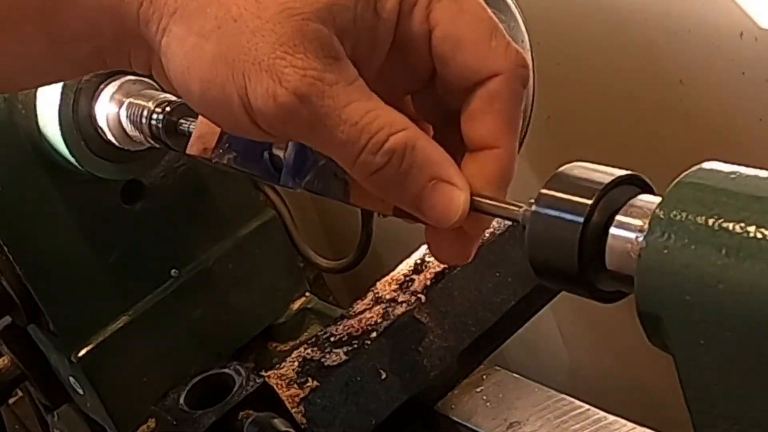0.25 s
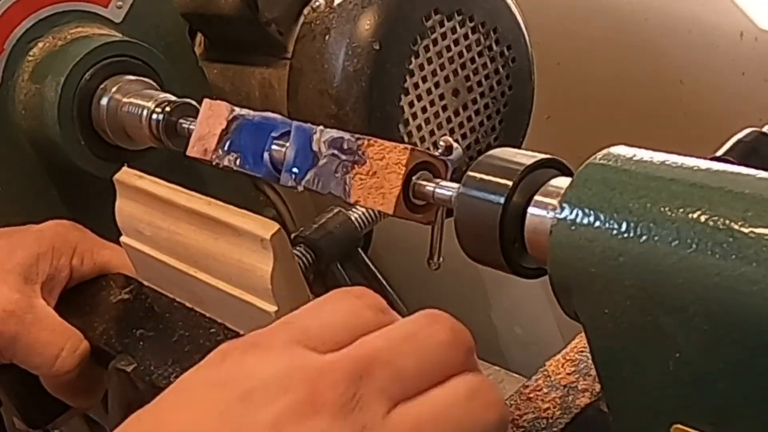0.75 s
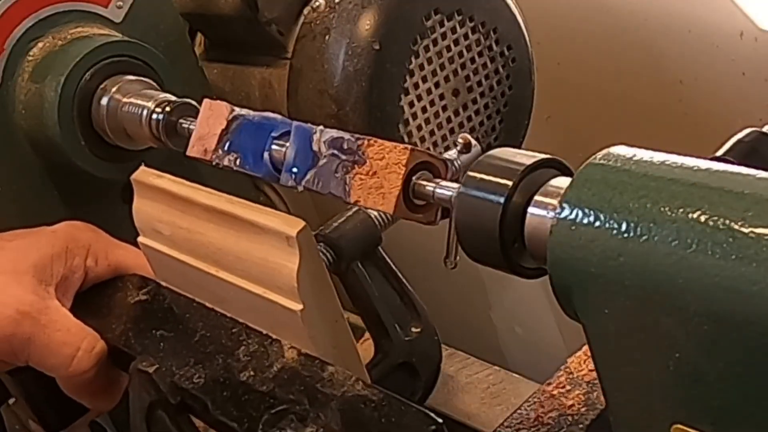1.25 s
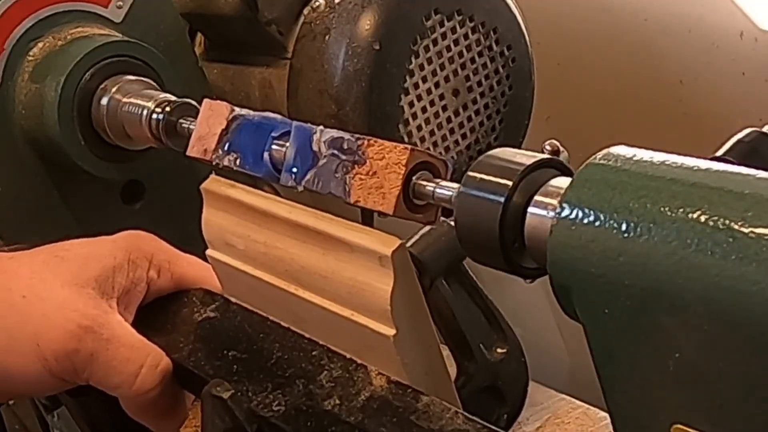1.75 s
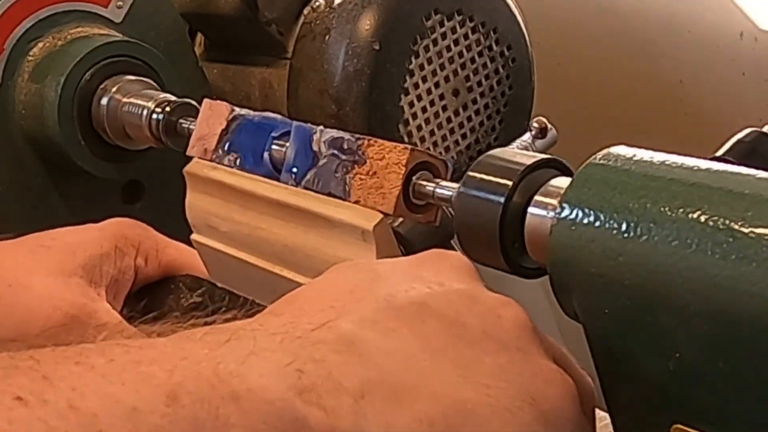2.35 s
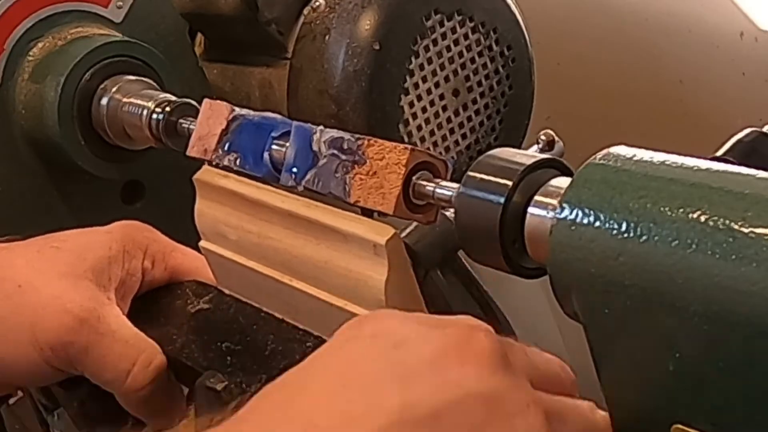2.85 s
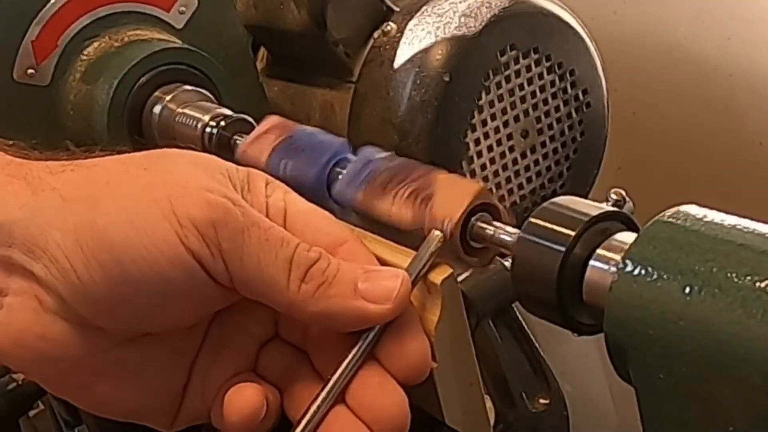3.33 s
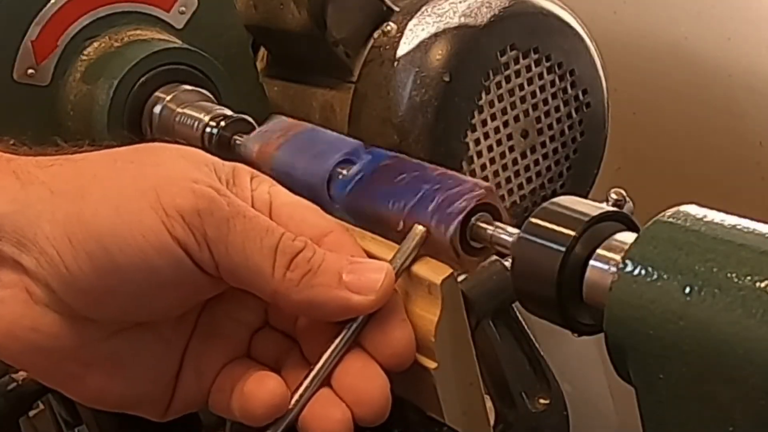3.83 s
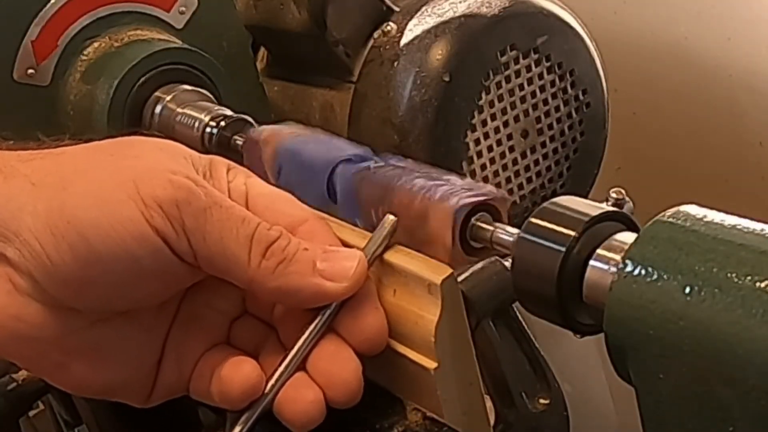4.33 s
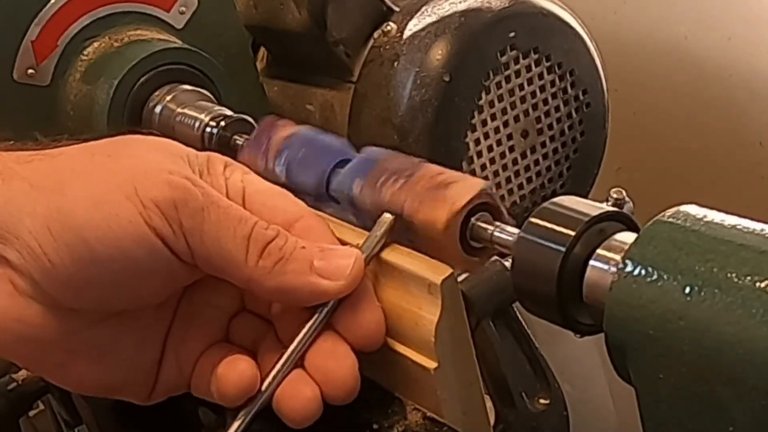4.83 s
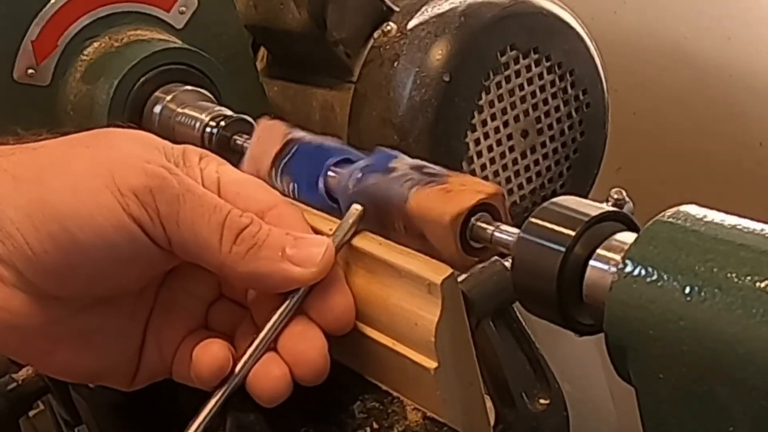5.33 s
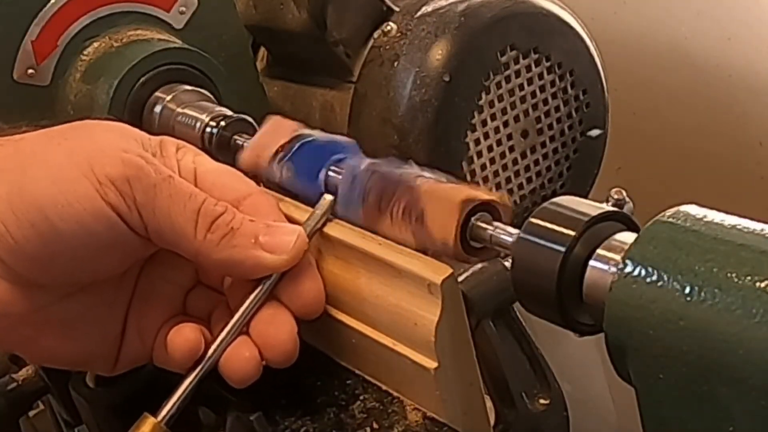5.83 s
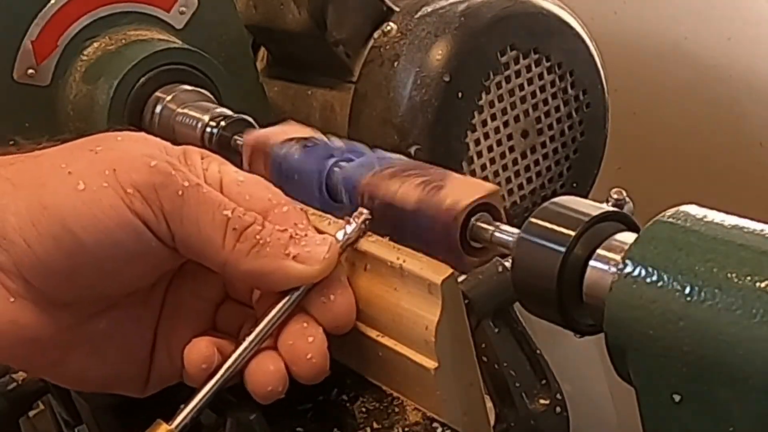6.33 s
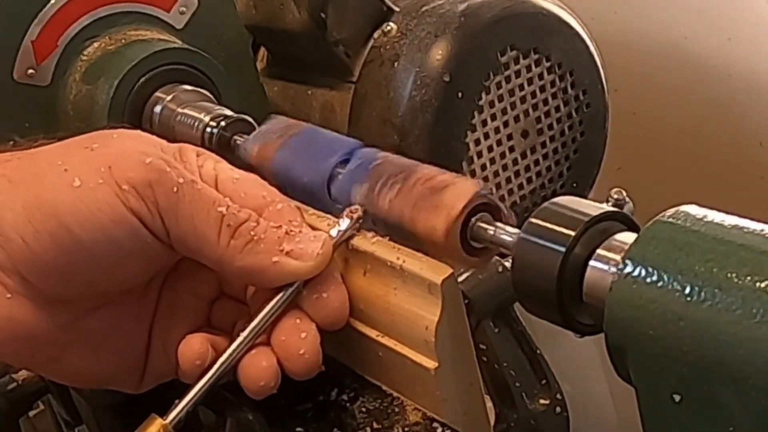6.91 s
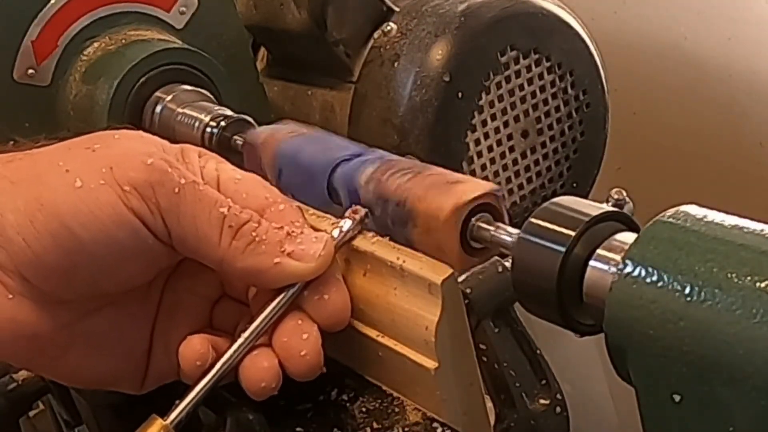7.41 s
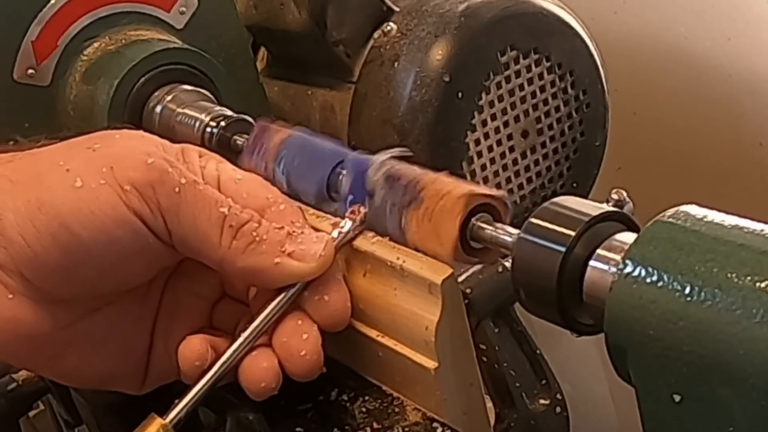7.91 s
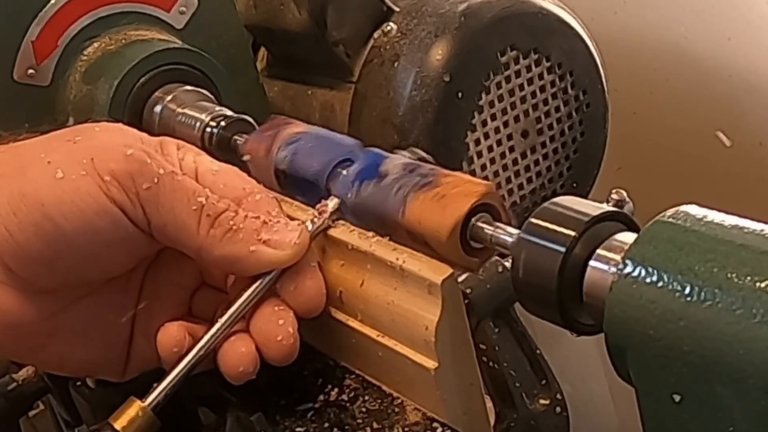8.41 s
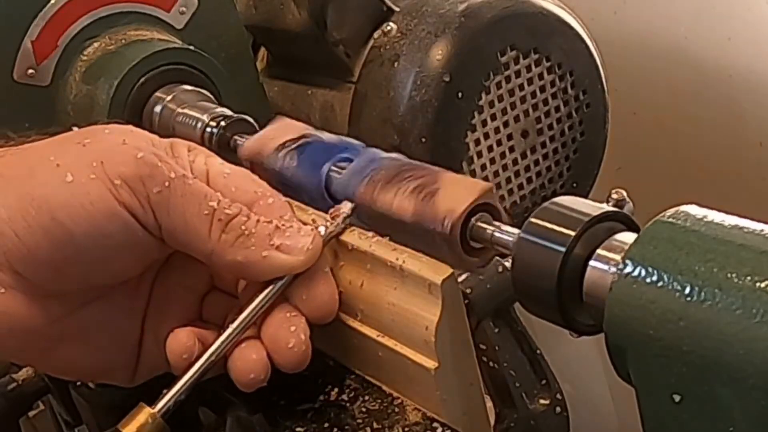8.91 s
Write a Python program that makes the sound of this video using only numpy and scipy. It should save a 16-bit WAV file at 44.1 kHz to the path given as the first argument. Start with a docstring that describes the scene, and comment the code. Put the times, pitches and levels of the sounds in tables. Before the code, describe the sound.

In a quiet workshop, heard close, soft air surrounds a short gritty metal grind from 0.1 s, the tailstock sliding along the bed and clicking at 0.28 s. Light dry touches come near 0.47 and 0.75 s. From 0.9 to 2.4 s, clamps and tool rest give irregular ringing iron knocks, the sharpest around 1.41 and 2.09 s, with firm clacks near 1.5 and 2.28 s. Near quiet follows until 3.06 s, when a lathe is abruptly at full speed, with no run-up. Its steady, slightly beating whine, rough belt drone and bright dense rattle carry a fast buzzing scrape from the tool on the square blank. Scraping chatters harder from 5.2 to 5.9 s. A brief dull bump lands at 6.05 s; then the whine strengthens and the pulsing eases. Cutting pressure still varies, with a harsher bite around 8.4 s, and the machine runs on to the end.

```python
"""A small wood lathe in a workshop, heard close to a two-port microphone in the shop's quiet air.
First the tailstock grinds along the iron bed to a click; then light dry touches and ringing knocks
of clamps and tool rest. Abruptly the lathe is at full speed: shaft and bearing tones whine, filtered noise
is the belt's drone, dense tiny impacts are the rattle, and bursts of fractures once a turn
are a hand tool scraping a square pen blank. Midway comes one brief dull bump."""
import sys
import numpy as np
from scipy import signal
from scipy.fft import rfft, irfft
from scipy.io import wavfile
from scipy.ndimage import uniform_filter1d, minimum_filter1d

SR = 44100
rng = np.random.default_rng(int(sys.argv[2]) if len(sys.argv) > 2 else 0)


def materialize(psi):
    """Save the field psi as 16-bit PCM at rate SR to the path in sys.argv[1].

    A 1-D psi becomes a single channel; in a 2-D psi each row is a channel.
    """
    bounded = np.clip(np.atleast_2d(psi).T, -1, 1)
    quanta = np.round(bounded * 32767).astype(np.int16)
    wavfile.write(sys.argv[1], SR, quanta)


N = 403956
T = np.arange(N) / SR
HZ = np.fft.rfftfreq(N, 1 / SR)

START_S = 3.064  # the lathe is heard from here
CHANGE_S = 6.05  # from here the spindle tones are stronger and the once-a-turn bursts weaker
SPINDLE_HZ = 43.64  # turns per second

# spectrum of struck iron: [hz, relative level_db per Hz]
IRON_SPECTRUM = [(100, -50), (240, -18), (340, -15.5), (470, -9.5), (620, 5.5), (770, -4.5), (930, 0.5),
                 (1300, -5), (1600, -7), (2100, -5.5), (2800, -5.5), (4300, -4.5), (6000, -7),
                 (8200, -13.5), (11500, -21), (16000, -23)]
# spectrum of the tool shaking on its rest, also used for the dull bump: [hz, relative level_db per Hz]
SHUDDER_SPECTRUM = [(60, -36), (200, -33), (400, 13), (700, 16), (1500, -11), (5000, -21), (16000, -50)]


def gain_of(db):
    """Decibels to amplitude."""
    return 10 ** (np.asarray(db) / 20)


def evened(x):
    """Scales to rms 1 over the whole signal."""
    return x / np.sqrt(np.mean(x ** 2) + 1e-20)


def read(points, hz):
    """Reads a table of values by frequency, interpolated along log frequency."""
    f, value = np.transpose(points)
    return np.interp(np.log(hz + 1), np.log(f + 1), value)


def colour(x, db):
    """Filters by a gain in dB for each frequency bin."""
    return irfft(rfft(x) * gain_of(db), x.shape[-1])


def wander(rate_hz):
    """Slow random drift of rms 1: noise with little left above rate_hz."""
    smooth = np.exp(-(HZ / rate_hz) ** 2)
    return evened(irfft(rfft(rng.standard_normal(N)) * smooth, N))


def held(s, length, edge):
    """Rises from 0 to 1, holds and falls back, with straight ramps."""
    rise = T - s
    fall = s + length + edge - T
    return np.clip(np.minimum(rise, fall) / edge, 0, 1)


def add(mix, s, sound):
    """Mixes a sound in at time s."""
    part = mix[:, round(s * SR):][:, :sound.shape[1]]
    part += sound[:, :part.shape[1]]


def grains(per_s, spread_db):
    """A mid and side train of tiny fractures at random moments and of random size."""
    size = gain_of(spread_db * np.minimum(rng.exponential(1, N), 4))
    happens = rng.random(N) < per_s / SR
    return evened(size * happens * rng.standard_normal((2, N)))


def hush(level_db=-59.5, swell_db=1):
    """The quiet air of the shop: soft noise that swells slowly."""
    # spectrum of the still air: [hz, relative level_db per Hz]
    air_spectrum = [(25, -16), (60, -5), (100, 0), (210, -2), (330, -12), (450, -13), (620, -2), (1000, -3),
                    (1500, -6), (2200, -13), (5000, -16), (9000, -21), (16000, -34)]
    air = evened(colour(rng.standard_normal((2, N)), read(air_spectrum, HZ)))
    return gain_of(level_db + swell_db * wander(2.9)) * air


def iron_ring(direct=0.4, modes_db=-8):
    """Response to one tap: a direct tick, the iron's modes and the short echo of the shop."""
    # modes of the iron parts: [hz, relative level_db, t60_s]
    iron_modes = [(577, -7.5, 0.12), (804, -13, .3), (903, 3.5, 0.14), (1240, -14, 0.18), (1660, -14, 0.23),
                  (2280, -7, 0.15), (2720, -4.5, .19), (3200, -7, 0.15), (3715, -1, .12), (4080, -19, 0.43),
                  (4382, -7, 0.17), (5475, -16, .24), (6200, -13, 0.23), (8320, 3.5, 0.13)]
    # time for the shop's echo to fall by 60 dB: [hz, t60_s]
    shop_decay = [(200, 0.1), (900, 0.32), (2500, 0.14), (8000, 0.12), (15000, 0.11)]
    t = np.arange(SR // 2) / SR
    hz, at, z = signal.stft(rng.standard_normal((2, len(t))), SR, nperseg=256)
    decay = gain_of(-60 * at / read(shop_decay, hz)[:, None])
    echo = signal.istft(z * decay, SR, nperseg=256)[1][:, :len(t)]
    modes = sum(gain_of(db - 60 * t / t60) * np.sin(2 * np.pi * (hz * t + rng.random()))
                for hz, db, t60 in iron_modes)
    tick = evened(1. * (t == 0))
    return evened(echo) + gain_of(modes_db) * evened(modes) + direct * tick


def slide(level_db=-21.0, modes_db=-20, stop_s=.2845, stop_db=-8, stop_decay_s=0.0024,
          centre_hz=7800, centre_width_hz=1500):
    """The tailstock grinds over grit on the bed until the steel centre clicks home."""
    # spectrum of the grinding bed: [hz, relative level_db per Hz]
    bed_spectrum = [(88, -74), (150, -30), (406, -27), (589, -3.5), (689, -7.5), (905, 1), (979, -13),
                    (1100, -8), (1390, -12), (2450, -9), (4000, -18.5), (4410, -10), (5790, -20),
                    (9260, -24), (16000, -39)]
    # one shove: it starts with a jerk, gathers speed, then slows to the stop
    start_s, rise_s, hold_s = .11, 0.031, 0.09
    jerk_db, slowing_db_per_s = -12, 300
    t = T - start_s
    gathering_db = jerk_db * np.clip(1 - t / rise_s, 0, 1)
    slowing_db = slowing_db_per_s * np.maximum(t - rise_s - hold_s, 0)
    force = gain_of(gathering_db - slowing_db) * (t > 0) * (T < stop_s)
    ring = iron_ring(modes_db=modes_db)

    grit = force * grains(per_s=4600, spread_db=0.0)[0]
    grind = signal.fftconvolve(grit[None], ring, axes=1)[:, :N]
    grind = np.sqrt(np.mean(force ** 2)) * evened(colour(grind, read(bed_spectrum, HZ)))

    blow = gain_of(stop_db) * np.exp(-abs(T - stop_s) / stop_decay_s) * (T > stop_s)
    click = signal.fftconvolve((blow * rng.standard_normal(N))[None], ring, axes=1)[:, :N]
    steel_db = 15 / (1 + ((HZ - centre_hz) / centre_width_hz) ** 2)
    click = colour(click, read(IRON_SPECTRUM, HZ) / 2 + steel_db)
    click = np.sqrt(np.mean(blow ** 2)) * evened(click)
    return gain_of(level_db) * grind + click


def ticks(decay_s=.0045):
    """Light dry touches of hand and lever: decaying noise that does not set the iron ringing."""
    # the touches: [start_s, level_db]
    touches = [(.464, -41), (.471, -39), (.748, -48)]
    out, t = np.zeros((2, N)), np.arange(SR // 20) / SR
    for s, db in touches:
        add(out, s, gain_of(db) * np.exp(-t / decay_s) * rng.standard_normal((2, len(t))))
    tint_db = read(IRON_SPECTRUM, HZ)
    mean_db = 10 * np.log10(np.mean(gain_of(tint_db) ** 2))
    return colour(out, tint_db - mean_db)


def iron_colour(hz, thud_db, bright_db, thud_hz=1600, bright_hz=6000):
    """Struck iron's spectrum, with its own lift or cut in the bed's low modes and in the treble."""
    thud = thud_db / (1 + (hz / thud_hz) ** 4)
    bright = bright_db * (1 - 1 / (1 + (hz / bright_hz) ** 4))
    return read(IRON_SPECTRUM, hz) + thud + bright


def knock(s, db, contact, thud_db, bright_db):
    """Metal grates on metal for a moment and the iron rings."""
    t = np.arange(SR // 2) / SR
    push = t / contact * np.exp(-t / contact) * rng.standard_normal(len(t))
    sound = signal.fftconvolve(push[None], iron_ring(), axes=1)[:, :len(t)]
    sound = colour(sound, iron_colour(np.fft.rfftfreq(len(t), 1 / SR), thud_db, bright_db))
    sound *= np.minimum(1, 10 * (1 - t / t[-1])) ** 2  # fades over the last tenth
    loudest = np.sqrt(uniform_filter1d(sound[0] ** 2, size=400).max())
    return s, gain_of(db) * sound / loudest


def whine(motor_db=-0.12, bearing_db=0.35, drift=0.00026, flutter=0.039):
    """Shaft harmonics and bearing tones share one slightly unsteady speed and beat against each other."""
    # motor shaft harmonics: [multiple of turning rate, level_db before motor_db]
    motor_lines = [(17, -46), (18, -23), (20, -40), (33, -35), (34, -30), (35, -24), (36, -23), (37, -36),
                   (38, -29), (39, -26), (40, -33), (41, -34), (54, -42)]
    # spindle harmonics: [multiple of turning rate, level_db before spindle_db]
    spindle_lines = [(12, -33), (21, -25), (23, -34), (24, -27), (26, -37)]
    # bearings and motor iron: [hz, level_db before bearing_db]
    bearing_lines = [(598.1, -45), (889.3, -34), (1071.3, -32), (1100.4, -34), (1189.7, -31), (1196.3, -33),
                     (1366.5, -39), (1375.9, -41), (1419.7, -25), (1584.4, -40), (1656.5, -38),
                     (1669.5, -36), (1676.1, -39), (1899.5, -36), (2359.6, -40), (2839.2, -42),
                     (3549.1, -40), (5094.6, -44)]
    motor_hz = 26.655
    clock = np.cumsum(1 + drift * wander(2.82)) / SR
    spindle_db = np.where(T < CHANGE_S, -10, 2.5)  # stronger after the change

    def tone(hz, db):
        level = gain_of(db) * np.sqrt(2) * (1 + flutter * wander(4.0))
        return level * np.sin(2 * np.pi * (hz * clock + rng.random()))

    def tones(lines, base_hz):
        return sum(tone(k * base_hz, db) for k, db in lines)

    mid = gain_of(motor_db) * tones(motor_lines, motor_hz)
    mid += gain_of(spindle_db) * tones(spindle_lines, SPINDLE_HZ)
    mid += gain_of(bearing_db) * tones(bearing_lines, 1)
    return np.array([mid, np.zeros(N)])


def housing():
    """Gain in dB of the resonances of headstock, rest and tool."""
    # the resonances: [hz, width_hz at half lift, lift_db]
    resonances = [(491, 62, 6), (644, 38, 2.5), (717, 16, 10), (920.7, 81, 16.5), (1032.6, 94, 15.5),
                  (1126, 72, 8), (1175, 30, 8.5), (1504, 70, 8.5), (1566, 22, 4), (1658, 19, 12),
                  (1827, 80, -20), (1887, 22, 10), (2500, 142, 9), (2680, 170, 6), (3200, 76, 4),
                  (3972, 146, 10), (4580, 230, 0), (6650, 190, 10), (8070, 330, 6), (11160, 690, 6)]
    return sum(db * np.exp(-np.log(16) * ((HZ - hz) / width) ** 2) for hz, width, db in resonances)


def pressure():
    """The pressure on the tool rises and falls: a curve in dB against the usual, plus brief changes."""
    # pressure curve, as the level of the cut: [time_s, level_db]
    curve = [(3.08, -24), (4.26, -21.5), (4.35, -21.5), (4.8, -24.5), (4.92, -22.5), (4.94, -23.5),
             (5.43, -17.5), (5.94, -22), (5.97, -25.5), (6.36, -21), (6.68, -24.5), (6.73, -19.5),
             (7.19, -23.5), (8.29, -21.5), (8.44, -15.5), (8.51, -24.5), (9.07, -20.5), (9.15, -22.5)]
    # brief changes of pressure: [start_s, length_s, change_db]
    changes = [(4.335, .25, 3.5), (4.875, 0.034, 3), (5.19, 0.061, 2.5), (5.857, 0.047, 4.5),
               (6.361, 0.04, 4), (8.365, 0.14, -0.5), (8.975, 0.064, 4.5)]
    usual_db, edge_s = -21.5, 0.0087
    curve_db = np.interp(T, *np.transpose(curve))
    return curve_db - usual_db + sum(db * held(s, length, edge_s) for s, length, db in changes)


def chatter():
    """1 while the tool chatters, else 0, with short ramps."""
    return held(s=5.17, length=0.75, edge=0.055)


def belt(level_db=-15.0, repeat=0.43, load_share=0.31, chatter_db=0.0):
    """The belt drums on the headstock, harder under load; part of its roughness repeats every lap."""
    # spectrum of the drone: [hz, relative level_db per Hz]
    drone_spectrum = [(30, -32), (160, -35.5), (215, -19.5), (300, -21.5), (400, -14), (520, -2),
                      (790, -11), (900, 0), (1300, 1.5), (1600, -3.5), (2100, -10.5), (4000, -16),
                      (16000, -48)]
    belt_hz = 8.885  # laps per second
    lap = np.resize(rng.standard_normal(round(SR / belt_hz)), N)
    share = np.clip(repeat, 0, 1)
    drive = np.sqrt(share) * lap + np.sqrt(1 - share) * rng.standard_normal((2, N))
    drone = evened(colour(drive, read(drone_spectrum, HZ) + housing()))
    return gain_of(level_db + load_share * pressure() + chatter_db * chatter()) * drone


def reflections(x, share=0.64, decay_s=0.0088):
    """Bed, wall and hands throw back close echoes that ripple the treble."""
    t = np.arange(SR // 40) / SR
    taps = rng.standard_normal((2, len(t))) * np.exp(-t / decay_s) * (t > .0007)
    echoes = signal.fftconvolve(x, taps / np.linalg.norm(taps[0]), axes=1)[:, :N]
    treble = signal.sosfilt(signal.butter(2, 1700, "high", fs=SR, output="sos"), echoes)
    return evened(x + share * treble)


def rattle(level_db=-18.5, throb=0.15, load_share=0.12):
    """Tool and live centre buzz in dense tiny impacts, nudged by the blank's four corners."""
    # spectrum of the buzz: [hz, relative level_db per Hz]
    buzz_spectrum = [(100, -45), (700, -23), (1500, -3), (2200, 3), (4500, 3.5), (7000, -5), (9500, -6),
                     (11500, -4.5), (13500, -12), (16000, -9)]
    corners = 1 + throb * np.cos(2 * np.pi * 4 * SPINDLE_HZ * T)
    drive = corners * grains(per_s=14000, spread_db=-0.5)
    buzz = reflections(colour(drive, read(buzz_spectrum, HZ) + housing()))
    return gain_of(level_db + load_share * pressure()) * buzz


def cutting(level_db=-21.0, contrast=1.59, uneven_db=2.0, ring=0.33, shudder_db=-31,
            tool_db=-26.5, tool_hz=3960, tool_width_hz=170):
    """Once a turn the high spot hits the edge and tears off a burst of chips; between, the tool rubs."""
    # spectrum of the chips: [hz, relative level_db per Hz]
    chip_spectrum = [(100, -53), (400, -23), (1500, -2.5), (3500, -7.5), (5500, -0.5), (9000, 0.5),
                     (11000, -6), (13000, -10), (16000, -24)]
    # during the chatter, the high spot that meets the edge creeps round the blank
    spot_turns, creep_turns, creep_mid_s, creep_s = .12, .75, 5.5, .06
    angle = spot_turns + creep_turns / (1 + np.exp((creep_mid_s - T) / creep_s))
    # bite: share of the cut's power in the burst (0-1), raised by chatter and by each dB of pressure
    bite = np.where(T < CHANGE_S, 0.41, 0.24) + 0.37 * chatter() + 0.1 * pressure()
    bite = np.clip(bite, 0, 1)
    count, turn = np.divmod(SPINDLE_HZ * (T - START_S) - angle, 1)
    # a sharp strike, then a short scrape; no two turns bite alike
    strength = gain_of(2.5 * rng.standard_normal(1024))[count.astype(int)]
    scrape = evened(strength * (np.exp(-turn / .05) + .8 * np.exp(-turn / .2)))
    force = np.sqrt(1 - bite + bite * scrape ** 2) * evened(gain_of(uneven_db * wander(73)))
    fractures = force * grains(per_s=6000, spread_db=1.5)
    body_db = ring * housing()
    chips = reflections(colour(fractures, read(chip_spectrum, HZ) + body_db))
    # each burst sets the steel tool ringing
    peak = signal.iirpeak(tool_hz, tool_hz / tool_width_hz, SR)
    steel = bite * evened(signal.lfilter(*peak, fractures))
    # a deep bite also shakes the tool against its rest
    shaking = scrape * rng.standard_normal((2, N))
    shudder = bite ** 2 * evened(colour(shaking, read(SHUDDER_SPECTRUM, HZ) + body_db))
    # chips grow faster than the pressure on the tool
    chips = gain_of(level_db + contrast * pressure()) * chips
    return chips + gain_of(tool_db) * steel + gain_of(shudder_db) * shudder


def bump(level_db=-15, decay_s=.003, top_hz=900, body_share=.35):
    """One brief dull bump under the drone: a decaying burst of low noise."""
    push = gain_of(level_db) * np.exp(-abs(T - CHANGE_S) / decay_s) * (T > CHANGE_S)
    body_db = body_share * read(SHUDDER_SPECTRUM, HZ) - 10 * np.log10(1 + (HZ / top_hz) ** 6)
    spread = np.sqrt(np.mean(gain_of(body_db) ** 2))
    return np.array([colour(push * rng.standard_normal(N), body_db) / spread, np.zeros(N)])


def ports(mix, width):
    """Mid and side become left and right; the treble reaches the right port slightly earlier."""
    # phase between the microphone's ports: [hz, left lead_rad]
    port_phase = [(4100, 0), (4600, -0.69), (8000, -0.27), (12000, -0), (16000, -.4)]
    side = colour(mix[1], read(width, HZ))
    lead = np.exp(.5j * read(port_phase, HZ))  # half the phase on each port
    left_right = np.array([mix[0] + side, mix[0] - side])
    return irfft(rfft(left_right) * np.array([lead, lead.conj()]), N)


def scene():
    """Setting-up sounds lie wide in the shop; the running lathe has its own width by frequency."""
    # clamps, levers and rest: [start_s, level_db, contact_s, bed thud_db, bright_db]
    knocks = [(0.882, -40, .002, -12, 7), (0.902, -32.5, 0.00099, -5, -5), (1.005, -34, 0.0034, -3, 4),
              (1.046, -39.5, 0.0012, 3, 5), (1.1, -37.5, 0.0038, -18, -2), (1.286, -35.5, 0.0046, 2, -8),
              (1.303, -29.5, 0.0024, -8, -7), (1.36, -39.5, 0.0048, -24, -1), (1.403, -22.5, 0.0045, 0, 9),
              (1.413, -15, 0.0038, -13, -2), (1.513, -22, 0.00081, -40, 2), (1.54, -31.5, 0.0046, -3, 5),
              (1.576, -35.5, 0.0052, -12, -3), (1.658, -47, 0.0034, 26, -19), (1.809, -35, 0.0017, 27.5, 4),
              (2.083, -36, 0.0012, -3, 8), (2.087, -15, 0.00054, -8.5, 9.5),
              (2.275, -19.5, 0.0011, -18, 1.5), (2.284, -23, 0.0034, -4.5, -20),
              (2.322, -35.5, 0.0027, 13, -6), (2.413, -31, 0.0047, 1.5, 1)]
    # difference between the ports, for the shop: [hz, gain of the side signal_db]
    shop_width = [(60, -2.5), (200, -7), (400, -13), (1300, -15), (2400, -12.5), (4400, -10), (8000, -6.5),
                  (15000, -2)]
    # the same for the running lathe: [hz, gain of the side signal_db]
    lathe_width = [(60, -8), (150, 0), (300, -11.5), (480, -1), (1000, -44), (1800, -52), (2700, -35.5),
                   (4000, -35), (5500, -8), (8000, -8), (11500, -4.5), (15000, -6)]
    setup = hush() + slide() + ticks()
    for row in knocks:
        add(setup, *knock(*row))
    running = np.clip((T - START_S) * 1000, 0, 1)  # full level within 1 ms
    lathe = running * (whine() + belt() + rattle() + cutting() + bump())
    return ports(setup, shop_width) + ports(lathe, lathe_width)


def record(dry):
    """A fast limiter holds peaks at full scale; then a low-pass sets the band limit."""
    edge_hz = 15850
    room_left = 1 / np.maximum(abs(dry).max(0), 1)
    gain = uniform_filter1d(minimum_filter1d(room_left, size=90), size=90)
    low_pass = signal.firwin(511, edge_hz, window=("kaiser", 9), fs=SR)
    return signal.oaconvolve(dry * gain, low_pass[None], "same")


dry = scene()
out = record(dry)
materialize(out)
```